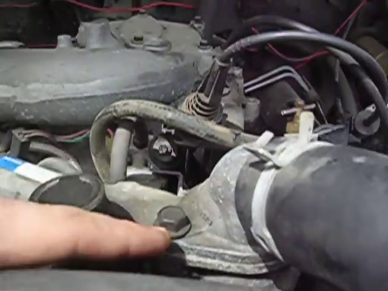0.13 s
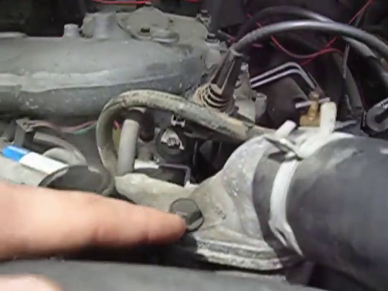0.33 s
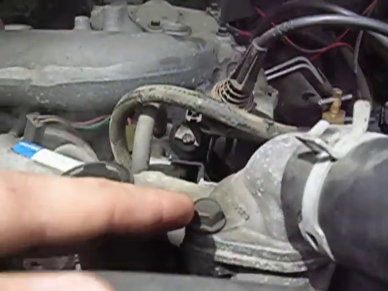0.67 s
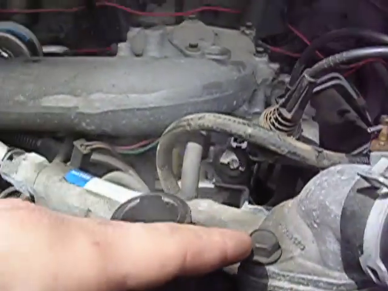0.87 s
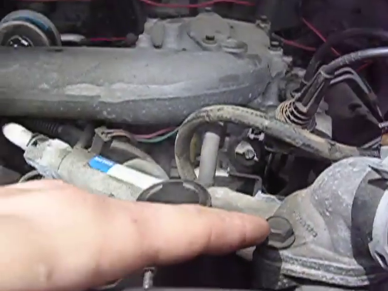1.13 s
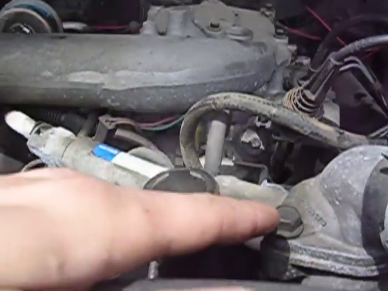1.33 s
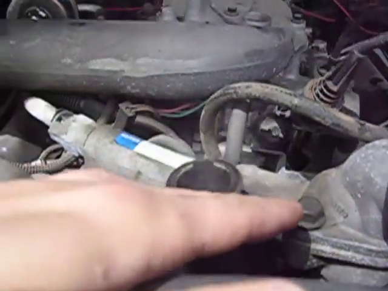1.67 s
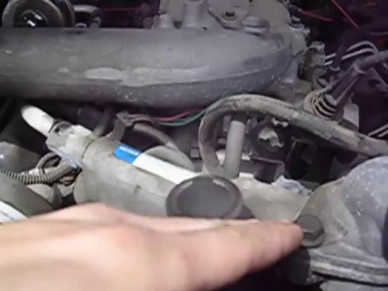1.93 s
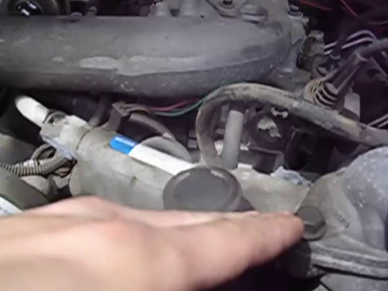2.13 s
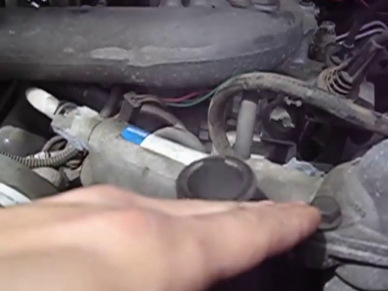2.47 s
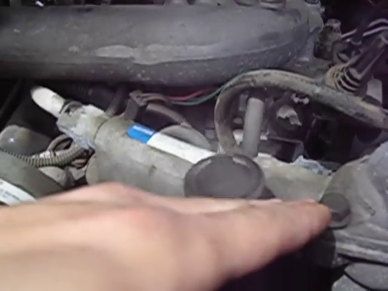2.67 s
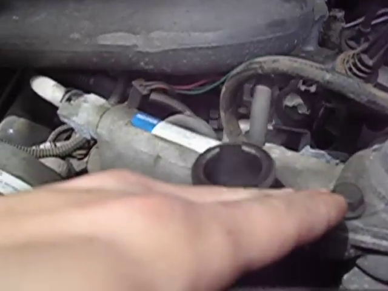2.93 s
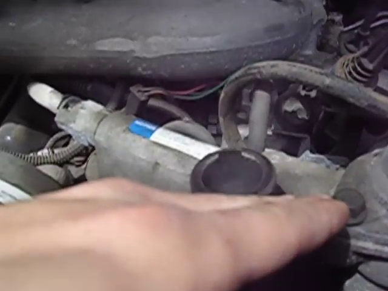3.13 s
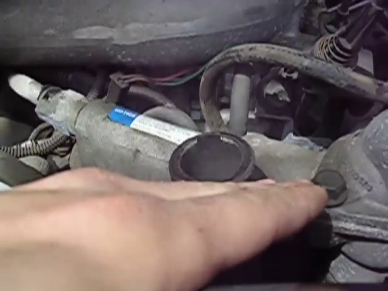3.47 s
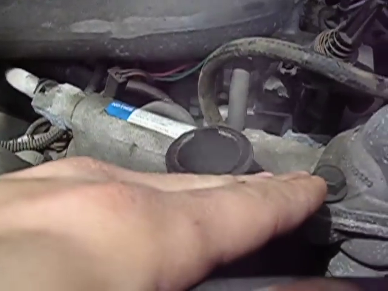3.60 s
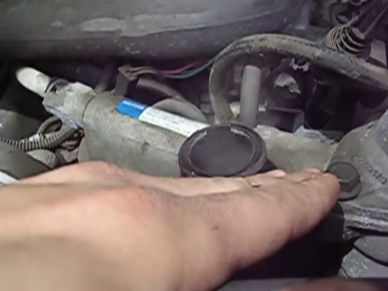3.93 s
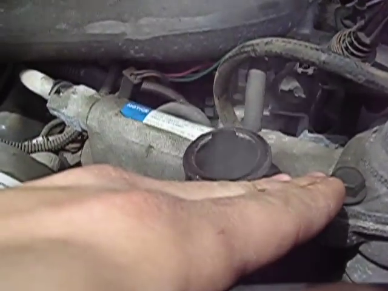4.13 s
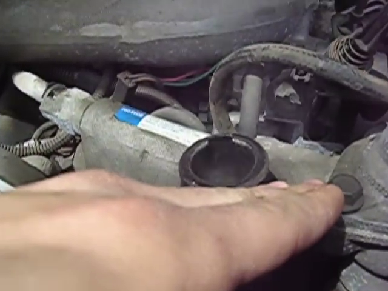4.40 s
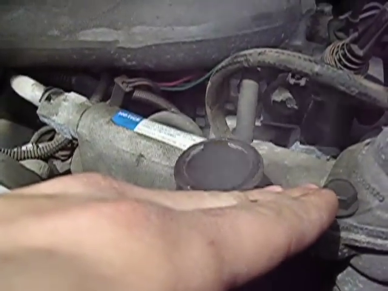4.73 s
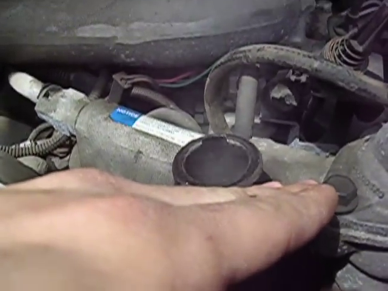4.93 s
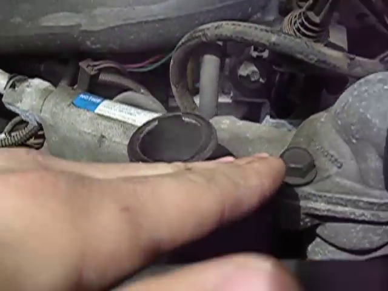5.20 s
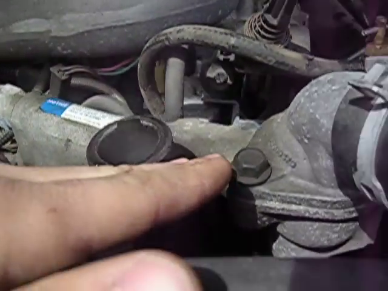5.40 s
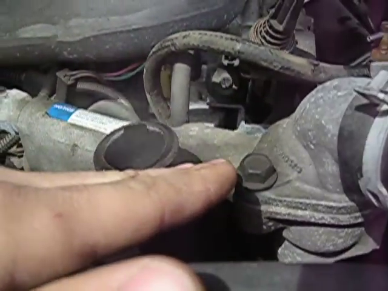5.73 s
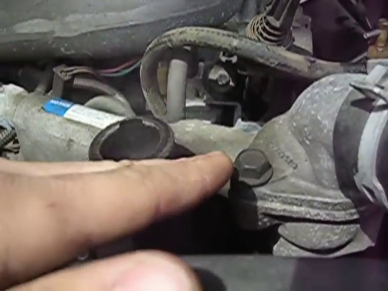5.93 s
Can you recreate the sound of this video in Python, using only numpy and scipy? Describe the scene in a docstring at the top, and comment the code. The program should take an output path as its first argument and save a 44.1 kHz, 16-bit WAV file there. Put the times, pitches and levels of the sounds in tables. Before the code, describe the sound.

A diesel truck engine idles roughly for the whole six seconds, heard close up in the open engine bay. The main sound is a hard, dense metallic clatter of knocks and clacks, in an uneven pattern that repeats about five times a second. Beneath it lie dull thumping and a faint low hum. The speed stays steady, with only a slight lope.

Harder knocks poke out irregularly, most often in the first two seconds, and again near 3, 3.8 and 5.1 seconds. Loose fuel pipes add a light buzz and occasional tiny rings. From about 1.5 to 2.5 seconds the microphone drifts along the engine and the higher clacks become slightly more prominent, easing briefly around 5.5 seconds. The small microphone gives a narrow, midrange-heavy sound with no high treble, just overloading on the peaks.

```python
"""A hard, uneven clatter: an eight-cylinder diesel idling roughly, close up in the open engine bay.
Each cam turn repeats one round of combustion and valve blows, which excite the resonant modes of block,
rocker cover and fuel pipes; now and then a cylinder knocks hard or a loose pipe rings out.
Beneath lie the thumping sump and a low hum. The accents shift as a small, narrow-band camera
microphone drifts along the engine, just overloading on the peaks."""
import sys
import numpy as np
from scipy import signal
from scipy.fft import rfft, irfft
from scipy.io import wavfile
from scipy.ndimage import uniform_filter1d, minimum_filter1d

SR = 44100
rng = np.random.default_rng(int(sys.argv[2]) if len(sys.argv) > 2 else 0)


def dump(signal):
    """Clip the signal to [-1, 1] and save it as 16-bit WAV at the path in sys.argv[1]."""
    limited = np.clip(np.atleast_2d(signal).T, -1, 1)
    pcm = np.round(limited * 32767).astype(np.int16)
    wavfile.write(sys.argv[1], SR, pcm)


N = 267731
TIME = np.arange(N) / SR
TURN_S, FIRST_TURN_S = .184024, -.0184  # a cam turn: 720 crank degrees, eight firings, about 652 rpm


# Combustion and valve blows of one cam turn, in relative levels: (crank angle [deg], power decay [ms],
# block [dB], cover [dB], pipes [dB], cover gain at the intake [dB])
TURN_BLOWS = [(7, 6, -13, -18, -35, 2), (30.8, 8.3, -19, -22.5, -34, 1.5),
              (93.3, 3.7, -6.5, -17, -32.5, 0.5), (107.6, 5.3, -30.5, -12, -37, 1.5),
              (158, 14, -15.5, -33.5, -39.5, -0.5), (191.5, 2.95, -12, -14, -31, 8),
              (201, 6, -17.5, -16.5, -47.5, -2.5), (277, 4, -11, -18, -29, 2),
              (296.5, 4.1, -31, -10, -40.5, 0), (326.5, 3, -9.5, -30.5, -34.5, -3.5),
              (372.3, 3, -13.5, -13.5, -34.5, -0.5), (391, 7.2, -16.5, -15, -37, 0),
              (449.5, 5, -13.5, -22.5, -38.5, -1), (480.5, 7.8, -18.5, -15, -40, 0),
              (533, 9.3, -19, -31.5, -35, -3.5), (554.7, 5.8, -12, -16, -35, 6),
              (565, 2.1, -32.5, -18, -49, -8), (615, 9.4, -19.5, -25, -37.5, -4.5),
              (657, 6.8, -20, -33, -50.5, -2.5)]

def clatter(scatter_db, jitter_ms):
    """Cyclic impact excitation: power fed to block, cover and pipes, no two firings quite alike."""
    block, cover, pipes = np.zeros((3, N))
    position = mic_position(TIME)
    for degrees, decay_ms, block_db, cover_db, pipes_db, intake_db in TURN_BLOWS:
        times = crank_times(degrees)
        strength, late = rng.standard_normal((len(times), 2)).T
        levels_db = firing_db(times) + scatter_db * strength
        blow = impact_power(times + jitter_ms * late / 1000, levels_db, decay_ms)
        block += amplitude(block_db) ** 2 * blow
        cover += amplitude(cover_db + intake_db * position) ** 2 * blow
        pipes += amplitude(pipes_db) ** 2 * blow
    return block, cover, pipes


# The hardest knocks, in relative levels: (time [s], block [dB], cover [dB])
HARD_KNOCKS = [(0.103, -8, -11.5), (0.12, -9.5, -27), (0.2393, -6, -9.5), (.556, -14.5, -12),
               (.602, -7, -10), (.773, -8, -20), (.931, -7, -17), (1.041, -9, -17), (1.113, -7, -28),
               (1.305, -11, -10), (1.353, -11, -13), (1.456, -7.5, -6), (1.640, -21, -10.5),
               (1.67, -28, -12), (1.898, -7, -5), (2.008, -27, -17), (2.078, -20, -11), (2.517, -23, -8.5),
               (2.701, -25, -7), (2.816, -31, -6.5), (2.998, -8.5, -6), (3.047, -13, -22),
               (3.127, -12, -26), (3.155, -30, -14.5), (3.252, -19, -11), (3.436, -27, -7),
               (3.695, -19, -12.5), (3.807, -7.5, -9), (3.942, -22, -12), (4.424, -9.5, -14),
               (4.609, -11, -10), (5.092, -6.5, -12), (5.277, -20, -13), (5.507, -12, -20),
               (5.736, -8, -14), (5.951, -17, -23)]

def knocks(decay_ms, pipes_db):
    """Structure-borne transmission: a knock's power enters block and cover; a little reaches the pipes."""
    times, block_db, cover_db = np.transpose(HARD_KNOCKS)
    block = impact_power(times, block_db, decay_ms)
    cover = impact_power(times, cover_db, decay_ms)
    return np.array([block, cover, amplitude(pipes_db) ** 2 * (block + cover)])


# Modes of the engine block: (frequency [Hz], bandwidth [Hz], relative level [dB])
BLOCK_MODES = [(506.9, 38, -1.5), (623, 31, -2.5), (662, 45, -3), (843, 28, -9.5), (841.5, 177, -3.5),
               (902, 60, -4.5), (990, 39, -5.5), (1144.4, 115, -3), (1286, 80, -8), (1401, 24, -5.5),
               (1518, 174, -7.5), (1541, 22, -10)]

def engine_block(power):
    """Forced vibration: the heavy block answers the blows in its midrange modes."""
    return amplitude(-.15) * rattle(power, BLOCK_MODES, clump_db=3.5, firmness=.5)


# Modes of the rocker cover: (frequency [Hz], bandwidth [Hz], relative level [dB])
COVER_MODES = [(1712, 230, -13.5), (1879, 130, -7.5), (2027, 69, -1.5), (2144, 88, -4.5), (2243, 33, -9.5),
               (2358, 19, -3), (2390, 141, -10), (2602, 280, -14.5)]

def rocker_cover(power):
    """Shell resonance: the lighter cover rings higher, around 2 kHz."""
    return amplitude(-.74) * rattle(power, COVER_MODES, clump_db=3, firmness=.61)


# Spots rung by the harder blows:
# (crank angle [deg], frequency [Hz], relative level [dB], gain at the intake [dB])
CLACK_SPOTS = [(19.95, 1800, -13.5, 1.5), (22.05, 1000, -15, -1), (85.9, 840, -14, 0.5),
               (104.05, 1135, -12.5, -1), (105, 2390, -17.5, 2), (106.3, 1480, -19.5, 0.5),
               (126, 2150, -15, 1), (193.5, 1960, -15, 2.5), (199.7, 890, -16.5, 1),
               (281.4, 1170, -11.5, 1), (299.2, 2055, -12, 2), (303, 2330, -16.5, 1), (328, 880, -15.5, 1),
               (378, 790, -18, 1), (383.3, 2390, -18, 0.5), (482.5, 900, -18.5, -2),
               (494, 1420, -18.5, -0.5), (572, 2040, -16, 3.5)]

def clacks(rise_ms, scatter_db, jitter_ms, detune):
    """Damped local resonance: each struck spot rings briefly, never twice at quite the same pitch."""
    t = np.arange(SR // 20) / SR
    sound = np.zeros(N + SR)
    for degrees, hz, db, intake_db in CLACK_SPOTS:
        for time in crank_times(degrees):
            strength, late, sharp, phase = rng.standard_normal(4)
            level_db = db + firing_db(time) + intake_db * mic_position(time) + scatter_db * strength
            start = max(round((time + jitter_ms * late / 1000) * SR), 0)
            tone = damped_tone(t, hz * (1 + detune * sharp), rise_ms, phase)
            sound[start:start + len(t)] += amplitude(level_db) * tone
    return sound[:N]


# Modes of the fuel pipes: (frequency [Hz], bandwidth [Hz], relative level [dB])
PIPE_MODES = [(3000, 38, -21), (3090, 110, -23.5), (3468, 340, -23.5), (3802, 69, -18.5), (3900, 25, -27),
              (4049, 87, -25.5)]

def fuel_pipes(power, growth_db_per_s):
    """Amplitude modulation: the loose pipes buzz in fits, a little louder as time goes on."""
    fits = amplitude(2 * wander(14) + growth_db_per_s * TIME)
    return amplitude(-1.2) * fits * rattle(power, PIPE_MODES, clump_db=6.5, firmness=.22)


# Moments when a loose fuel pipe rings out: (time [s], level [dB])
PIPE_ZINGS = [(.601, -29), (0.915, -33), (1.04, -27), (1.589, -28), (1.835, -27), (2.938, -27),
              (3.031, -29), (3.117, -28.5), (3.131, -40), (3.488, -27.5), (3.988, -33), (4.911, -31),
              (5.44, -26.5), (5.757, -30)]

def zings(decay_ms):
    """Contact chatter: a loose pipe rings for a moment in its three highest modes."""
    times, levels_db = np.transpose(PIPE_ZINGS)
    return rattle(impact_power(times, levels_db, decay_ms), PIPE_MODES[-3:], clump_db=2, firmness=.8)


# Modes of the sump: (frequency [Hz], bandwidth [Hz], relative level [dB])
SUMP_MODES = [(125, 57, -20), (167, 15, -15), (257, 123, -10.5), (291, 38, -7), (340, 27, -3),
              (434, 82, -13.5)]
# Thumps of sump and block in one cam turn: (crank angle [deg], frequency [Hz], level [dB], rise [ms])
TURN_THUMPS = [(20, 170, -29.5, 7), (34.96, 640, -22, 8), (84.9, 420, -26, 4.4), (165, 512, -22.5, 11),
               (179.8, 320, -29, 4.1), (275.5, 345, -24.5, 6), (386.7, 380, -27.5, 3.6),
               (468, 130, -34.5, 5.5), (500, 225, -23.5, 5.5), (554, 290, -27.5, 5.5), (596.3, 253, -23, 6),
               (649, 300, -28, 3.7), (682, 205, -24, 4)]

def sump(scatter_db, jitter_cycles, churn_db):
    """Heavily damped oscillation: each thump swings the metal a few cycles, over the crank's churning."""
    t = np.arange(SR // 10) / SR
    sound = amplitude(churn_db) * resonant_noise(SUMP_MODES)
    for degrees, hz, db, rise_ms in TURN_THUMPS:
        times = crank_times(degrees)
        strength, late = rng.standard_normal((len(times), 2)).T
        pushes = impulses(times + jitter_cycles * late / hz, amplitude(db + scatter_db * strength))
        sound += signal.oaconvolve(pushes, damped_tone(t, hz, rise_ms))[:N]
    return sound


# Engine orders, the middle one belt-driven: (frequency [cycles per cam turn])
ENGINE_ORDERS = [8, 14.66, 16]
# Strength of each order: (level [dB])
ORDER_LEVELS = [-54, -45, -49.5]

def hum(waver, rumble_db):
    """Rotational orders: low tones locked to the crank, in a faint rumble."""
    turns = (TIME - crank_lag_s(TIME)) / TURN_S
    tones = np.zeros(N)
    for order, db in zip(ENGINE_ORDERS, ORDER_LEVELS):
        level = amplitude(db) * (1 + waver * wander(4))
        tones += level * np.sin(2 * np.pi * (order * turns + rng.random()))
    return tones + amplitude(rumble_db) * resonant_noise([(100, 40, 0)])


# Lag of the crank behind a steady beat: (time [s], lag [ms])
GOVERNOR_LAG = [(0, -1.6), (.35, .2), (1.09, 2.4), (1.45, 1.1), (1.82, 1.2), (2.15, -1.1), (2.56, -.2),
                (3.13, -3), (3.72, .5), (4.15, -1.9), (4.92, 1), (5.34, -1.3), (6.07, 3.2)]

def crank_lag_s(times):
    """Phase modulation: the governor hunts, so the crank runs now late, now early."""
    return follow(GOVERNOR_LAG, times) / 1000


def crank_times(degrees):
    """Four-stroke periodicity: the times at which a crank angle comes round, once each cam turn."""
    steady = FIRST_TURN_S + TURN_S * (np.arange(N / SR // TURN_S + 1) + degrees / 720)
    return steady + crank_lag_s(steady)


# How hard the cylinders fire: (time [s], gain [dB])
FIRING_EFFORT = [(0, -0.5), (.9, 0.7), (2.1, -0.8), (3.05, -1), (3.45, -2), (3.68, 1), (4.15, -1),
                 (4.75, -0.5), (5, -0.5), (6.07, 0.5)]

def firing_db(times):
    """Combustion variation: the blows strengthen and weaken as the idle lopes."""
    return follow(FIRING_EFFORT, times)


# Path along the engine: (time [s], position [-1 at the radiator hose, 1 over the intake])
MIC_PATH = [(0, -1.35), (.8, -1.6), (1.5, -0.23), (2.1, 0.41), (2.5, 0.85), (4.2, .5), (5, 0.63),
            (5.5, 0.05), (6.07, 1)]

def mic_position(times):
    """Proximity: the place of the drifting microphone sets which blows stand out."""
    return follow(MIC_PATH, times)


def impact_power(times, levels_db, decay_ms):
    """Exponential decay: the power of blows that set in within a few milliseconds and die away."""
    ms = np.arange(SR // 10) / SR * 1000
    envelope = (1 - np.exp(-ms)) ** 2 * np.exp(-ms / decay_ms)
    onsets = impulses(times, amplitude(levels_db) ** 2)
    return np.maximum(signal.oaconvolve(onsets, envelope)[:N], 0)


def rattle(power, modes, clump_db, firmness):
    """Random excitation: clumps of tiny impacts ring a part; firmness (0-1) evens each blow's energy."""
    response, window = modal_response(modes), signal.windows.hann(600)
    chatter = unit_rms(rng.standard_normal(N) * amplitude(clump_db * np.tanh(wander(450))))
    sound = signal.oaconvolve(np.sqrt(power) * chatter, response)[:N]
    mean_power = signal.oaconvolve(power, response ** 2)[:N]
    given, spent = (np.abs(signal.oaconvolve(p, window, "same")) + 1e-9 for p in (mean_power, sound ** 2))
    return sound * (given / spent) ** (firmness / 2)


def modal_response(modes, size=8192):
    """Modal superposition: a part's ringing after one tap, minimum-phase and of unit energy."""
    f = np.fft.rfftfreq(size, 1 / SR)
    power = sum(amplitude(db) ** 2 / (1 + (np.sqrt(2) - 1) * (2 * (f - hz) / width) ** 2) ** 2
                for hz, width, db in modes)
    log_gain = np.log(np.r_[power, power[-2:0:-1]] + 1e-12) / 2
    spectrum = np.exp(np.conj(signal.hilbert(log_gain)))
    response = np.fft.ifft(spectrum).real[:size // 2]
    return response / np.linalg.norm(response)


def resonant_noise(modes):
    """Resonant filtering: white noise coloured by a set of modes."""
    return signal.oaconvolve(rng.standard_normal(N), modal_response(modes))[:N]


def damped_tone(t, hz, rise_ms, phase=0):
    """Damped oscillation: a sine that swells for rise_ms, then dies away."""
    age = t * 1000 / rise_ms
    return age * np.exp(1 - age) * np.sin(2 * np.pi * (hz * t + phase))


def impulses(times, heights):
    """Impulse train: one push at each time."""
    train = np.zeros(N)
    train[np.clip(np.round(times * SR).astype(int), 0, N - 1)] += heights
    return train


def wander(hz):
    """Low-pass noise: a smooth fluctuation of rms 1, rolling off above hz."""
    f = np.fft.rfftfreq(N, 1 / SR)
    return unit_rms(irfft(rfft(rng.standard_normal(N)) * np.exp(-(f / hz) ** 2), N))


def follow(curve, times):
    """Linear interpolation of a control curve."""
    return np.interp(times, *np.transpose(curve))


def amplitude(db):
    """Decibels to amplitude ratio."""
    return 10 ** (np.asarray(db) / 20)


def unit_rms(x):
    """Normalisation to rms 1."""
    return x / np.sqrt(np.mean(x ** 2) + 1e-20)


def scene():
    """Superposition: block, cover and pipes rattle and clack over the thumping sump and the hum."""
    blows = clatter(scatter_db=1.21, jitter_ms=1) + knocks(decay_ms=5.7, pipes_db=-28.5)
    on_block, on_cover, on_pipes = blows
    # the constant powers are gears and belts, which keep every part stirring between blows
    block = engine_block(on_block + amplitude(-23.5) ** 2)
    cover = rocker_cover(on_cover + amplitude(-33.5) ** 2)
    pipes = fuel_pipes(on_pipes + amplitude(-41.5) ** 2, growth_db_per_s=.5)
    ringing = amplitude(-3) * clacks(rise_ms=3.74, scatter_db=2, jitter_ms=1.2, detune=.018)
    ringing += zings(decay_ms=7.3)
    low = sump(scatter_db=.5, jitter_cycles=.2, churn_db=-27.5) + hum(waver=.15, rumble_db=-54.5)
    return (block + cover + pipes + ringing + low)[None]


def limiter(x, threshold, slope, window_samples=45):
    """Dynamic compression: a fast gain dip with a soft ratio rounds off the highest peaks."""
    allowed = np.minimum(1, threshold / (np.abs(x) + 1e-9)) ** slope
    return x * uniform_filter1d(minimum_filter1d(allowed, window_samples), window_samples)


def record(dry):
    """Band limiting and asymmetric clipping: a thin microphone channel sits off-centre and overloads."""
    band_edge_hz, top_hz = 4210, 15900
    bias, overload = -.059, .71
    thin = signal.sosfilt(signal.butter(2, 60, "highpass", fs=SR, output="sos"), dry)
    held = limiter(thin, threshold=.65, slope=.67)
    band_filter = signal.firwin(301, band_edge_hz, window=("kaiser", 8), fs=SR)
    narrow = signal.oaconvolve(held, band_filter[None], "same")
    clipped = np.clip(narrow + bias, -overload, overload)
    top_filter = signal.firwin(255, top_hz, window=("kaiser", 9), fs=SR)
    return signal.oaconvolve(clipped, top_filter[None], "same")


dry = scene()
out = record(dry)
dump(out)
```